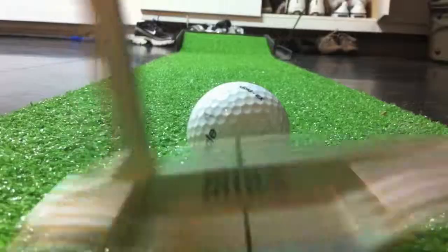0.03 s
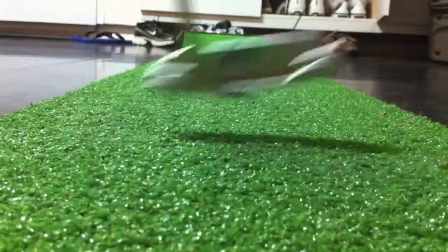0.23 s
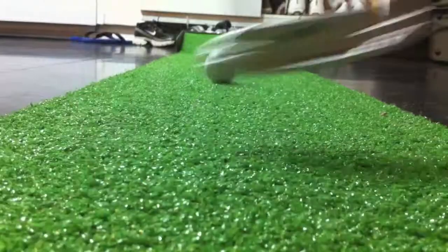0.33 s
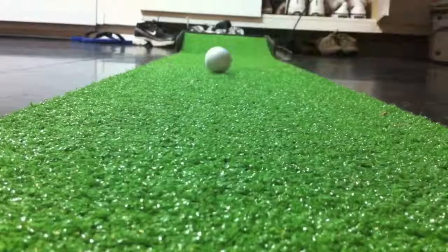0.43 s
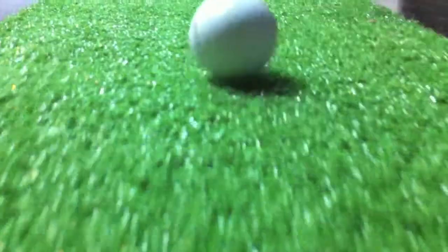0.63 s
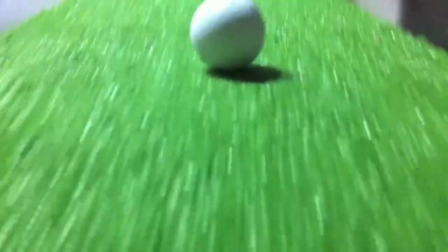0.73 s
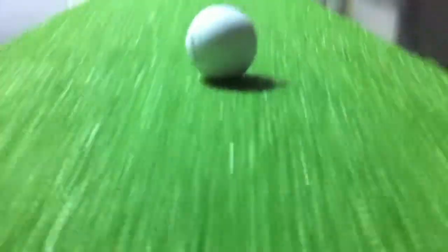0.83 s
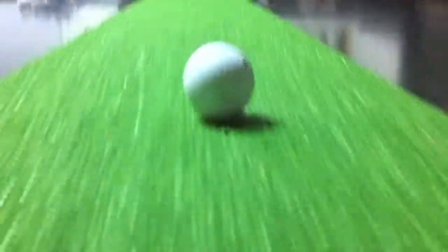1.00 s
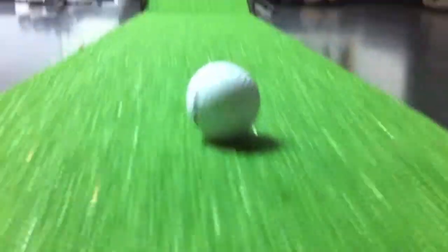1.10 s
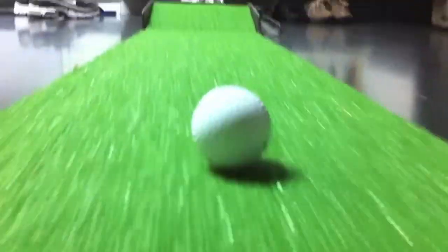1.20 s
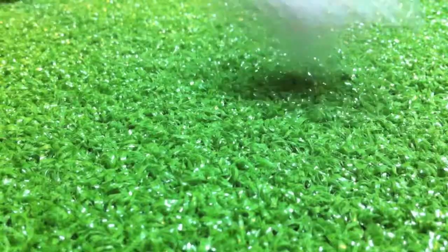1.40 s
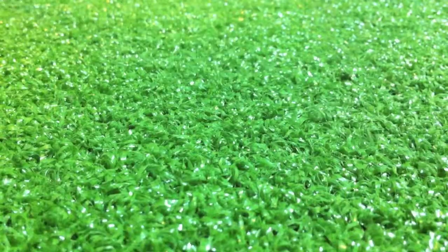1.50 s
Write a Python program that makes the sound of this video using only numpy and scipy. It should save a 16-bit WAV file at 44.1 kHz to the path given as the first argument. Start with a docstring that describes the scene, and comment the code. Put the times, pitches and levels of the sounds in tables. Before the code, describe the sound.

A putter knocks a golf ball at about 0.2 seconds, close and sharp, after a faint swish; the room echoes briefly. The ball rolls much more quietly over a turf mat, with a low rumble, rustling plastic blades and faint hollow tones. The sound dips out near 0.65 and 1.4 seconds. Soft bumps come around 0.9, 1.1 and 1.4, then swishes and a sharp tick at 1.5, fading by 1.7.

```python
"""Indoors, on a turf mat over a hard floor, a putter knocks a golf ball close to the microphone. Putter and
ball ring briefly, and the room answers with echoes and a fading tail. The rolling ball makes a low rumble, soft
bumps and a rustle of plastic blades, with faint hollow tones and one sharp flick. Short swishes brush over the
turf, the first two as the putter swings in before the knock. The sound comes in three stretches, each faded in
and out."""
import sys
import numpy as np
from scipy import signal
from scipy.fft import rfft, irfft, next_fast_len
from scipy.io import wavfile

SR = 44100
rng = np.random.default_rng(int(sys.argv[2]) if len(sys.argv) > 2 else 0)


def log_audio(samples):
    """Write samples as a 16-bit WAV file to the path given in sys.argv[1]."""
    # one column per channel
    frames = np.atleast_2d(samples).T
    # limit to full scale, then quantise
    limited = np.clip(frames, -1, 1)
    pcm = np.round(limited * 32767).astype(np.int16)
    wavfile.write(sys.argv[1], SR, pcm)


N = 68355
STRIKE_S = 0.2118  # the putter meets the ball
# stretches of sound: start/s, fade-in/s, end/s, fade-out/s
STRETCHES = [(0.087, 0.062, 0.6547, .085), (.652, 0.071, 1.3875, .085), (1.386, 0.058, 1.7, .05)]


def undb(db):
    """Turn decibels into a factor to multiply by."""
    return 10 ** (np.asarray(db) / 20)


def unit(x):
    """Scale a signal so that its average size (rms) is 1."""
    return x / np.sqrt(np.mean(x ** 2))


def clock():
    """The time of every sample, in seconds."""
    return np.arange(N) / SR


def noise():
    """White noise: an even hiss."""
    return rng.standard_normal(N)


def colour(x, points):
    """Make some pitches louder and others softer, along a curve of (f/Hz, level/dB) points."""
    size = 2 * next_fast_len(N)
    hz, db = np.array(points).T
    bin_hz = np.arange(size // 2 + 1) * SR / size
    gain = undb(np.interp(np.log(bin_hz + 1), np.log(hz), db))
    # folding the cepstrum keeps the filter from sounding before its input does
    cepstrum = irfft(np.log(gain))
    cepstrum[1:size // 2] *= 2
    cepstrum[size // 2 + 1:] = 0
    return irfft(rfft(x, size) * np.exp(rfft(cepstrum)))[:N]


def wander(per_s):
    """A random drift of size about 1 that heads for a new value per_s times a second."""
    return unit(np.interp(clock() * per_s, np.arange(N), noise()))


def since(start):
    """Seconds since start, zero before."""
    return np.maximum(clock() - start, 0)


def decay(start, t60):
    """Jump to 1 at start, then die away; t60 is the time it takes to fall by 60 dB."""
    return (clock() >= start) * np.exp(-np.log(1000) * since(start) / t60)


def ring(start, hz, t60):
    """One pure tone that dies away, as from something struck."""
    return np.sin(2 * np.pi * hz * since(start)) * decay(start, t60)


def swell(middle, half_length):
    """A rounded rise and fall."""
    return np.exp(-.5 * np.abs((clock() - middle) / half_length) ** 3)


def blades(per_s=9000, size_scatter=0.17):
    """Plastic blades spring back, making a crowd of tiny clicks."""
    clicks = rng.random(N) < per_s / SR
    return clicks * noise() * np.exp(size_scatter * noise())


def rolling():
    """The mat rumbles under the ball while its blades scrub and rustle."""
    # loudness over time: t/s, rumble level/dB, scrub level/dB, rustle level/dB
    levels = [(.1, -56.5, -62.5, -65), (0.169, -56.5, -56.5, -78), (0.301, -53, -58, -86),
              (.45, -56.5, -63, -71), (.57, -54.5, -65, -72.5), (.72, -54, -59.5, -64),
              (0.812, -47, -52.5, -54.5), (.86, -47.5, -54, -59.5), (.93, -49, -53.5, -56),
              (1., -51.5, -58, -55), (1.07, -56, -53.5, -59.5), (1.11, -55, -57.5, -60.5),
              (1.141, -47.5, -52.5, -58.5), (1.2, -56, -59, -61.5), (1.312, -54.5, -61, -63.5),
              (1.41, -52.5, -47, -58.5), (1.45, -58, -52.5, -71), (1.49, -54.5, -51.5, -64),
              (1.55, -53.5, -57, -65)]
    # colours of the low rumble, the middle scrub and the high rustle: f/Hz, level/dB
    rumble_colour = [(25, -17), (70, -22.5), (105, -4.5), (145, -7), (192, 2), (265, 0.5), (300, 0),
                     (340, -6.5), (410, 2), (470, -6), (540, -5), (750, -15), (1200, -34.5), (3000, -49)]
    scrub_colour = [(200, -26), (500, -1), (800, -0.5), (1150, 0), (1600, -7), (2300, -12), (4000, -17),
                    (7000, -21), (16000, -42.5)]
    rustle_colour = [(1000, -11), (2500, -6.5), (4500, -3.5), (6500, -1.5), (10000, 0), (14000, -2),
                     (16000, -2.5)]
    times, *columns = np.array(levels).T
    rumble_db, scrub_db, rustle_db = (np.interp(clock(), times, db) for db in columns)
    flicker_db = 1.07 * wander(per_s=35.25)
    rumble = undb(rumble_db + flicker_db) * unit(colour(noise(), rumble_colour))
    scrub = undb(scrub_db + flicker_db) * unit(colour(blades(), scrub_colour))
    rustle = undb(rustle_db) * unit(colour(unit(blades()) + noise(), rustle_colour))
    return rumble + scrub + rustle


def hollow_tones(waver=.015):
    """Faint hollow tones come and go, their pitch wavering a little."""
    # tones: middle t/s, half-length/s, level/dB, f/Hz
    tones = [(0.122, 0.019, -53.5, 470), (.178, 0.0084, -49.5, 470), (0.196, 0.046, -54, 684.4),
             (.57, 0.15, -60.5, 409.3), (0.76, 0.12, -62, 770), (0.993, 0.039, -51, 409),
             (1.048, 0.036, -53.5, 395), (1.313, .025, -55, 372.4), (1.453, 0.028, -53, 812),
             (1.47, 0.052, -58, 630)]
    out = np.zeros(N)
    for middle, half_length, db, hz in tones:
        pitch_hz = hz * (1 + waver * wander(per_s=90))
        tone = np.sqrt(2) * np.sin(2 * np.pi * np.cumsum(pitch_hz) / SR)
        out += undb(db) * swell(middle, half_length) * tone
    return out


def swishes():
    """Short brushes over the turf, each a swelling band of clicks and hiss."""
    # brushes: middle t/s, half-length/s, level/dB, centre f/Hz, width/octaves
    brushes = [(0.139, 0.03, -54.5, 7040, 1.5), (0.176, 0.012, -54.5, 7400, 0.56),
               (0.962, 0.096, -56.5, 12400, .6), (1.456, 0.018, -56.5, 8100, 3.5),
               (1.458, 0.023, -58.5, 2400, 0.47), (1.51, 0.011, -55, 9100, 2.6)]
    grid_hz = np.geomspace(50, 20000, 40)
    out = np.zeros(N)
    for middle, half_length, db, hz, octaves in brushes:
        band_db = -10 * np.log10(1 + (2 * np.log2(grid_hz / hz) / octaves) ** 2)
        rustle = colour(unit(blades()) + noise(), np.c_[grid_hz, band_db])
        out += undb(db) * swell(middle, half_length) * unit(rustle)
    return out


def putt(contact_s=0.000721, knock_db=-4.5, crack_db=-25):
    """A short push makes the knock and rings putter and ball; nearby surfaces add a dry crack."""
    # how well the push turns into sound: f/Hz, level/dB
    knock_colour = [(40, -56), (90, -52.5), (170, -16), (450, -9.5), (1000, -0.5), (1550, 4.5),
                    (2600, -1.5), (3200, -3), (4000, 18.5), (5200, 14), (6000, -2), (8700, 4.5),
                    (11500, -4.5), (16000, -9)]
    # ringing tones of putter and ball: f/Hz, level/dB, t60/s
    club_tones = [(170, -57, 0.021), (886, -23, 0.024), (1500, -35.5, .025), (3565, -25.5, 0.03),
                  (4430, -35, 0.03), (5120, -28.5, 0.016), (6480, -29, .012), (7030, -44, 0.022),
                  (8000, -53, .012), (8780, -33, .013), (9500, -54.5, 0.012), (11330, -45, .016)]
    # sound thrown back by nearby surfaces: f/Hz, level/dB
    crack_colour = [(300, -27), (1000, -1.5), (2100, 5.5), (2700, -16.5), (4000, -0.5), (6000, -4.5),
                    (7800, -3.5), (10000, -15), (16000, -20)]
    push = np.sin(np.pi * np.minimum(since(STRIKE_S) / contact_s, 1))
    knock = colour(push, knock_colour)
    knock = undb(knock_db) * knock / np.abs(knock).max()
    ringing = sum(undb(db) * ring(STRIKE_S + contact_s / 2, hz, t60) for hz, db, t60 in club_tones)
    crack = undb(crack_db) * unit(colour(noise(), crack_colour)) * decay(STRIKE_S, t60=0.013)
    return ringing + crack - knock


def room(knock, tail_db=-44.5, build_s=.005, waver=0.9):
    """The walls echo the knock, then leave a blurred tail and a few unevenly lingering tones."""
    # first echoes off the walls: delay/s, level/dB
    walls = [(0.0107, -41.5), (.0128, -33), (.0156, -30.5), (.0206, -29.5)]
    # colours of the echoes and of the tail: f/Hz, level/dB
    echo_colour = [(100, -10), (1000, -4), (4000, -4), (8000, 3.5), (14000, 13.5)]
    tail_colour = [(100, -14), (250, -12), (500, -2.5), (700, -2), (1050, -0.5), (1500, -6), (2300, -22.5),
                   (3200, -26), (3620, -7.5), (4500, -21.5), (5300, -8), (6200, -20), (7500, -17.5),
                   (11000, -24.5), (16000, -33)]
    # tones at which the room rings: f/Hz, level/dB, t60/s
    room_tones = [(655, -56, 1), (846, -47, 0.72), (859, -48, 1.0), (1025, -59.5, 0.46), (1720, -59, 0.88),
                  (2016, -60.5, 0.6)]
    t = clock()
    copies = sum(undb(db) * np.interp(t - delay, t, knock) for delay, db in walls)
    echoes = colour(copies, echo_colour)
    build_up = 1 - np.exp(-since(STRIKE_S) / build_s)
    tail = undb(tail_db) * unit(colour(noise(), tail_colour)) * decay(STRIKE_S, t60=0.69)
    ringing = sum(undb(db) * ring(STRIKE_S, hz, t60) * (1 + waver * wander(per_s=46))
                  for hz, db, t60 in room_tones)
    return echoes + build_up * (tail + ringing)


def bumps(rise_share=0.072):
    """The ball rides over uneven spots, making soft knocks that die quickly."""
    # bumps: t/s, relative level/dB, f/Hz, t60/s
    spots = [(.869, -35.5, 298, 0.11), (1.124, -44.5, 381, 0.098), (1.136, -43, 638, 0.045),
             (1.223, -42.5, 302, 0.037), (1.4244, -36.5, 890, 0.015), (1.435, -40, 1010, 0.025),
             (1.489, -74, 440, 0.035)]
    out = np.zeros(N)
    for start, db, hz, t60 in spots:
        soft_start = 1 - np.exp(-since(start) / (rise_share * t60))
        out += 2 * undb(db) * ring(start, hz, t60) * soft_start
    return out


def blade_flick(at_s=1.5048, peak_db=-35.5):
    """One blade flicks with a sharp tick."""
    # colour of the tick: f/Hz, level/dB
    tick_colour = [(300, -22), (2000, 3), (6000, -10), (9000, 0), (16000, -6)]
    click = np.gradient(1. * (clock() >= at_s))
    tick = colour(click, tick_colour)
    return undb(peak_db) * tick / np.abs(tick).max()


def fades(rise_power=1.17, fall_power=1.31):
    """A volume curve: each stretch rises from silence and sinks back."""
    volume = np.zeros(N)
    for start, rise, end, fall in STRETCHES:
        fade_in = np.clip((clock() - start) / rise, 0, 1) ** rise_power
        fade_out = np.clip((end - clock()) / fall, 0, 1) ** fall_power
        volume += fade_in * fade_out
    return volume


def scene(hiss_db=-99.5):
    """All the sounds under the fades, over a trace of hiss that starts with the first stretch."""
    knock = putt()
    sound = knock + room(knock) + rolling() + swishes() + bumps() + hollow_tones() + blade_flick()
    hiss = undb(hiss_db) * noise() * (clock() > STRETCHES[0][0])
    return (sound * fades() + hiss)[None]


def record(dry, low_hz=75, top_hz=15900):
    """The small microphone thins the bass; the recorder cuts the highest treble."""
    bass_cut = signal.butter(2, low_hz, "high", fs=SR, output="sos")
    treble_cut = signal.ellip(10, .2, 70, top_hz, fs=SR, output="sos")
    return signal.sosfilt(treble_cut, signal.sosfilt(bass_cut, dry))


dry = scene()
out = record(dry)
log_audio(out)
```